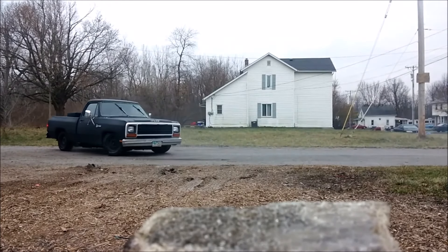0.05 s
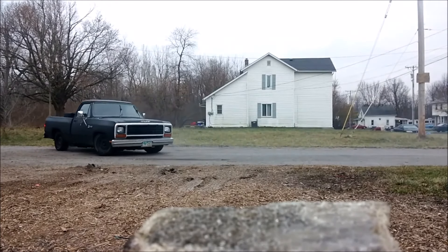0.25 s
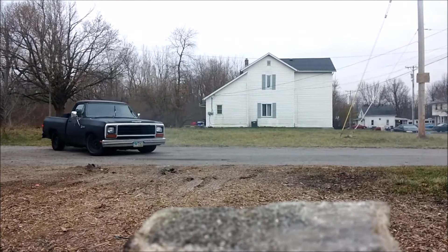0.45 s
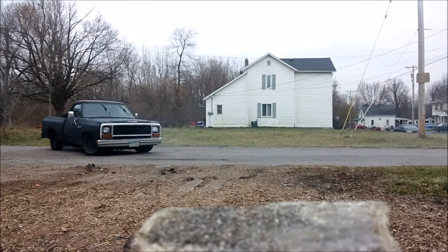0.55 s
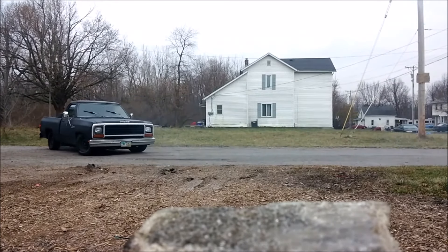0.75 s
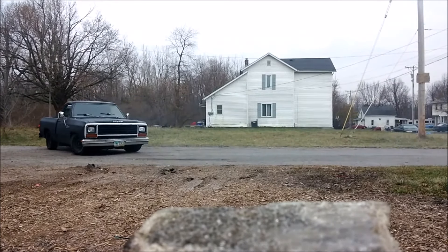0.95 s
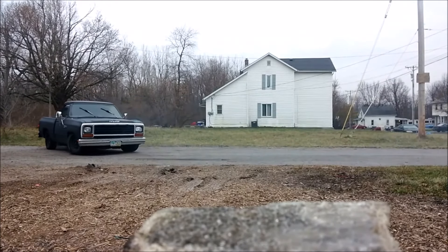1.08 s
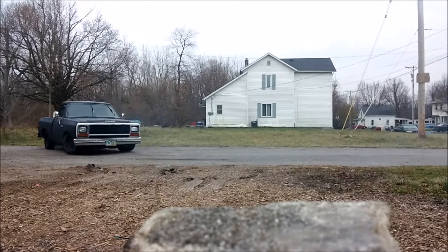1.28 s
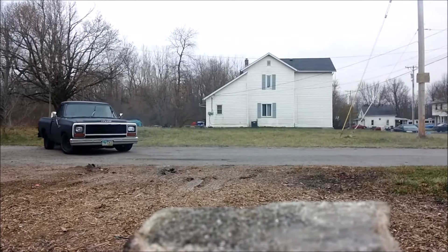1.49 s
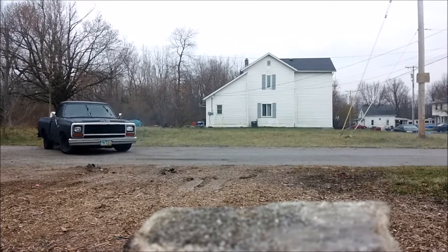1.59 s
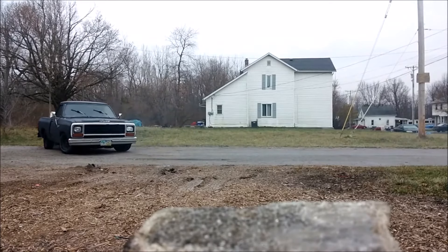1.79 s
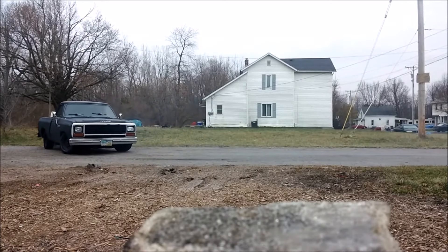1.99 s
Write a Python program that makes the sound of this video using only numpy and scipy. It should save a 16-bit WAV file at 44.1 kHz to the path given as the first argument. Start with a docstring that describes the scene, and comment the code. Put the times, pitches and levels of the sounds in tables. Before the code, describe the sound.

Outdoors, a rough V8 truck creeps along a road: uneven booming, burbling exhaust, metallic engine clatter and high squeaks throughout, a sharp stone snap, later a loose part's knock, then a short wind thump on the left.

```python
"""On a road in the open air, an old V8 pickup creeps along to the left of the microphone.
Uneven firing pulses ring its open pipes, which boom, bark and burble. Shaped noise makes the engine
clatter, the tyres' gritty hiss and snapping stones, the rattles and the faint background air.
Narrow bands of noise make a ringing part and belt-like squeals; a loose part clunks as dying tones
and noise. A puff of wind hits only the left microphone port."""
import sys
import numpy as np
from scipy import signal
from scipy.fft import rfft, irfft, next_fast_len
from scipy.io import wavfile
from scipy.ndimage import uniform_filter1d

SR = 44100
rng = np.random.default_rng(int(sys.argv[2]) if len(sys.argv) > 2 else 0)


def bounce(signal):
    """Save signal as a 16-bit WAV file at the path given by the first command-line argument."""
    frames = np.transpose(np.atleast_2d(signal))
    limited = np.clip(frames, -1, 1)
    pcm = np.round(limited * 32767).astype(np.int16)
    wavfile.write(sys.argv[1], SR, pcm)


N = 89875
T = np.arange(N) / SR  # time of each sample, s

# Levels of the truck's sounds are those before the path to the two ports.
# Engine speed: t/s, speed/(four-stroke cycles per second)
ENGINE_SPEED = [(0, 5.157), (.3, 5.058), (.6, 5.12), (.85, 5.317), (1.0, 5.335), (1.15, 4.944),
                (1.35, 4.742), (1.55, 5.012), (1.75, 5.21), (2.04, 4.898)]
START_TURN = .0145  # engine position at the start, cycles
# Cylinders in firing order: lateness/s (below zero is early), strength/dB
CYLINDERS = [(.0029, -3.9), (-.0033, 4), (-.0009, 2.4), (-.0011, .5), (.0016, -1), (.0023, 4.8),
             (-.0016, -8.7), (.0002, 3.2)]
SCATTER_DB, JITTER_S = 4.1, 0.00029  # random spread from firing to firing

# Exhaust boom: t/s, level/dB
BOOM_LEVEL = [(0.0, -21.5), (0.055, -24.5), (0.1, -32.5), (0.21, -23), (0.29, -28.5), (0.41, -22.5),
              (0.49, -29.5), (0.61, -24), (0.69, -31), (0.83, -21), (0.89, -32.5), (1.02, -26),
              (1.08, -37.5), (1.14, -22.5), (1.235, -37), (1.28, -21.2), (1.38, -32), (1.45, -28),
              (1.51, -38.2), (1.59, -35), (1.66, -28.5), (1.82, -28), (1.9, -31.5), (1.945, -28),
              (2.04, -28)]
# Colour of the two booming pipe resonances: f/Hz, level/dB
BOOM_COLOUR = [(25, -43.5), (45, -18.5), (62, -9), (73, -3), (81, 4.5), (89, -2), (97, -11.5), (105, 4),
               (113, 1.5), (122, 0.5), (137, -1.5), (165, -31.5), (240, -25), (400, -48.5), (2000, -83)]
# Shift of the upper boom against the lower: t/s, level/dB
BOOM_TILT = [(0, -2), (.22, -1.5), (.3, -2.5), (.6, -0.5), (.7, 2), (.8, 1), (1.02, 6.5), (1.1, 1.5),
             (1.25, -1), (1.45, -3.5), (1.56, 9.5), (1.66, 4), (1.78, -11.5), (1.85, 5.5), (1.95, -8.5),
             (2.04, 5)]
BOOM_SPLIT_HZ = 96  # the valley between the two booms
# Colour of the higher pipe resonances: f/Hz, level/dB
BARK_COLOUR = [(60, -52), (160, -5), (188, 4.5), (215, -0.5), (255, 2), (280, 1.5), (306, 1), (345, -7.5),
               (420, -11), (700, -30), (2000, -46.5)]
BARK_DB, BARK_FOLLOWS = -48.5, 0.18  # mean level; share of the boom's swings in dB that it follows
# Moments when the pipes bark up: t/s, f/Hz, level/dB
BURBLES = [(.2, 268, -40.5), (.21, 302, -39.5), (.335, 245, -41), (.405, 256, -43.5), (.54, 396, -42.5),
           (.61, 252, -45.5), (.68, 260, -49), (.82, 387, -44.5), (1.025, 190, -39.5), (1.118, 331, -41.5),
           (1.28, 242, -44.5), (1.6, 220, -41.5), (1.82, 190, -41), (1.99, 195, -44)]
BURBLE_S, BURBLE_WIDTH_HZ = 0.044, 48

# Engine clatter, before the lift in engine_bay: t/s, level/dB
CLATTER_LEVEL = [(0.0, -38.5), (0.08, -43.5), (0.31, -39), (0.34, -46.5), (0.39, -38.5), (0.43, -48),
                 (0.49, -40), (0.53, -43.5), (0.66, -39), (0.72, -42.5), (0.75, -39.5), (0.89, -43.5),
                 (1.28, -42), (1.68, -45.5), (1.89, -45), (2.04, -48)]
# Colour of the clatter: f/Hz, level/dB
CLATTER_COLOUR = [(100, 15.5), (250, 9.5), (450, -2), (800, 2.5), (1400, 4.5), (2200, 3), (3000, 1),
                  (3800, 3), (4600, -11.5), (6000, -14), (12000, -32.5)]
# Moments when one part sings: t/s, level/dB
RINGS = [(.02, -45), (0.177, -41.5), (0.379, -37.5), (0.484, -39), (0.638, -41), (0.761, -38),
         (0.951, -44.5), (1.04, -46.5), (1.271, -41.5), (1.598, -49), (1.69, -54), (1.881, -41.5)]
RING_HZ, RING_WIDTH_HZ, RING_S = 1208.5, 39, 0.059

# One long squeal, mostly falling: t/s, f/Hz, level/dB
SQUEAL = [(.16, 3540, -75), (.185, 3513, -39.5), (.25, 3500, -50), (.3, 3370, -46), (.33, 3320, -53),
          (0.371, 3380, -35), (.385, 3220, -38.5), (.405, 3230, -75)]
# Chirps: t/s (middle), length/s, f/Hz (at the middle), level/dB
CHIRPS = [(0.174, 0.016, 3750, -36.5), (0.278, 0.019, 2740, -43), (0.297, 0.031, 3630, -40),
          (0.473, 0.039, 2770, -40), (0.481, 0.046, 3630, -39.5), (0.565, 0.09, 3758, -41.5),
          (0.742, 0.054, 3540, -42), (0.795, 0.043, 2700, -43), (0.886, 0.038, 2740, -40),
          (0.99, 0.035, 3710, -56), (1.049, 0.026, 2332, -42), (1.132, 0.031, 2300, -35),
          (1.192, 0.039, 2370, -38.5), (1.333, 0.016, 2860, -39), (1.36, .025, 2350, -39),
          (1.417, 0.04, 3680, -37), (1.499, 0.022, 3483, -39), (1.499, 0.019, 2880, -37.5),
          (1.582, 0.051, 2810, -40.5), (1.606, 0.048, 2317, -43), (1.693, 0.038, 3710, -43.5),
          (1.762, 0.023, 3565, -39.5), (1.809, 0.047, 2310, -41.5), (1.832, 0.021, 2900, -43.5),
          (1.826, 0.053, 3810, -53), (1.933, 0.02, 2890, -38.5), (2.027, 0.024, 2955, -38.5)]
CHIRP_RISE_HZ, CHIRP_SPREAD = 114, 8  # rise over one length; bandwidth times length

# Knocks of the loose part: t/s, level/dB
CLUNKS = [(0.414, -42.5), (0.468, -42.5), (1.4196, -30.5), (1.428, -46), (1.44, -38.5)]
# Tones of the struck chassis: f/Hz, level/dB, time to fall 60 dB/s
CHASSIS = [(314, -3.5, 0.14), (487, -6, 0.084), (579, -6, .1), (688, 1.5, .09), (840, -0.5, 0.054),
           (970, -3, 0.055)]

# Stones that snap under a tyre: t/s, f/Hz, level/dB
STONES = [(0.6193, 3770, -20.5), (.641, 3930, -28), (.654, 3700, -31), (0.682, 4570, -31),
          (1.099, 5000, -36)]
# Colour of a snap: f/(pitch of the snap), level/dB
SNAP_COLOUR = [(.4, -29), (.62, -25), (.75, -2.5), (1, 3.5), (1.2, -2.5), (1.35, -10), (1.6, -35), (3, -65)]

# Bodywork rattles: t/s (middle), length/s, level/dB
RATTLES = [(0.466, 0.034, -40), (0.784, 0.16, -43), (1.26, 0.024, -44), (1.897, 0.077, -42.5)]
# Colour of a rattle: f/Hz, level/dB
RATTLE_COLOUR = [(500, -36), (1000, -19), (1350, -2.5), (1750, -8.5), (2300, -8), (4000, -35)]

# Tyres on grit, before each port's own lift: t/s, level/dB
GRIT_LEVEL = [(0.0, -52.5), (0.06, -54), (0.14, -54), (0.45, -61), (0.47, -55), (0.52, -61.5),
              (0.63, -51.5), (0.68, -55), (1.05, -62), (1.14, -49), (1.24, -59), (1.26, -54), (1.68, -65.5),
              (1.72, -54), (2.01, -63), (2.04, -51.5)]
# Colour of the grit: f/Hz, level/dB
GRIT_COLOUR = [(500, 22), (2000, 4), (4500, 12.5), (6200, 4), (7500, 6), (9500, 1.5), (11500, -8.5),
               (14000, -16), (16000, -36)]

# Pushes of the wind, before the low cut: t/s (middle), length/s, f/Hz, level/dB
BUFFETS = [(1.7, 0.018, 100, -8), (1.719, .016, 180, -12.5), (1.739, 0.017, 88.3, -10.5)]
PUFF_S, PUFF_HOLD_S = 1.690, 0.1  # start of the slap; how long it lasts

# How much louder the left port is than the right: f/Hz, level/dB
LEFT_OVER_RIGHT = [(60, 8), (160, 4.5), (300, 2), (1100, 7), (1800, 3.5), (3000, 11), (4700, 11),
                   (7000, 3.5), (14000, -3)]
# Scattered sound against direct sound: f/Hz, level/dB
SCATTERED_COLOUR = [(60, -9), (120, -30), (300, -4), (800, -2), (2500, -10.5), (6000, -10)]
PORT_LAG_S = .0001  # the right port hears the truck this much later
TOP_HZ = 15700  # upper limit of all the sound


def amp(db):
    """Turn decibels into a plain gain."""
    return 10 ** (np.asarray(db) / 20)


def unit(x):
    """Scale x to an rms of 1."""
    return x / np.sqrt(np.mean(x ** 2) + 1e-20)


def along(points, hz):
    """Read a value between (f/Hz, value) points on a log axis."""
    f, v = np.transpose(points)
    return np.interp(np.log(hz + 1), np.log(f + 1), v)


def curve(rows):
    """Join (t/s, value) points with lines, one value per sample."""
    return np.interp(T, *np.transpose(rows))


def filtered(x, response):
    """Multiply the spectrum of x by a response that depends on frequency."""
    m = next_fast_len(N + SR // 2)
    return irfft(rfft(x, m) * response(np.fft.rfftfreq(m, 1 / SR)), m)[..., :N]


def noise(colour):
    """Coloured noise of rms 1."""
    return unit(filtered(rng.standard_normal(N), lambda hz: amp(along(colour, hz))))


def causal(x, colour):
    """Pass x through a body that rings only after it is struck."""
    size = 16384
    # Folding the cepstrum forward in time gives the filter its minimum phase.
    cepstrum = irfft(np.log(amp(along(colour, np.fft.rfftfreq(size, 1 / SR)))))
    cepstrum[1:size // 2] *= 2
    cepstrum[size // 2:] = 0
    return signal.fftconvolve(x, irfft(np.exp(rfft(cepstrum))))[:N]


def resonance(x, centre_hz, width_hz):
    """Pass x through one resonance."""
    return filtered(x, lambda f: 1j * f * width_hz / (centre_hz ** 2 - f ** 2 + 1j * f * width_hz))


def fuzzy(phase, width_hz):
    """A narrow band of noise around a running phase in turns, rms 1."""
    i, q = filtered(rng.standard_normal((2, N)), lambda hz: 1 / (1 + (2 * hz / width_hz) ** 2))
    return unit(i * np.cos(2 * np.pi * phase) + q * np.sin(2 * np.pi * phase))


def patchy(x, depth_db):
    """Give x random patches of gain in time and frequency."""
    z = signal.stft(x, nperseg=512)[2]
    field = uniform_filter1d(rng.standard_normal(z.shape), size=4, axis=0)
    field = uniform_filter1d(field, size=7, axis=1)
    return unit(signal.istft(z * amp(depth_db * unit(field)), nperseg=512)[1][:N])


def decay(start, t60):
    """A sudden start that falls 60 dB in t60 seconds."""
    return (T >= start) * amp(-60 * np.maximum(T - start, 0) / t60)


def swell(s, length, sound):
    """A sound that swells and fades around time s, rms 1 at its top."""
    shape = np.exp(-(2 * (T - s) / length) ** 2)
    return shape * sound * np.linalg.norm(shape) / np.linalg.norm(shape * sound)


def exhaust(turn):
    """One pulse per firing rings the pipes; unequal cylinders make the V8 lope."""
    firing = np.arange(int(len(CYLINDERS) * turn[-1]) + 1)
    late, strength_db = np.array(CYLINDERS)[firing % len(CYLINDERS)].T
    chance = rng.standard_normal((len(firing), 2))
    when = np.interp(firing / len(CYLINDERS), turn, T) + late + JITTER_S * chance[:, 0]
    strength = amp(strength_db + SCATTER_DB * chance[:, 1])
    pulses = np.bincount(np.clip(when * SR, 0, N - 1).astype(int), strength, N)
    pulses = pulses - pulses.mean()

    boom = unit(causal(pulses, BOOM_COLOUR))
    bark = unit(causal(pulses, BARK_COLOUR))
    lower = filtered(boom, lambda hz: 1 / (1 + (hz / BOOM_SPLIT_HZ) ** 12))
    upper = boom - lower
    tilt = amp(curve(BOOM_TILT) / 2)  # half is added above, half taken off below

    level_db = curve(BOOM_LEVEL)
    bark_db = BARK_DB + BARK_FOLLOWS * (level_db - level_db.mean())
    burbles = sum(amp(db) * swell(s, BURBLE_S, resonance(bark, hz, BURBLE_WIDTH_HZ))
                  for s, hz, db in BURBLES)
    return amp(level_db) * (lower / tilt + upper * tilt) + amp(bark_db) * bark + burbles


def engine_bay(turn, beat_db=1.1, rough_db=1.48, patchy_db=3, lift_db=4.0):
    """Shifting noise clatters in beat with the firings, and one part rings."""
    flutter = noise([(5, -6.0), (60, 25), (250, -10), (600, -86)])
    beat = amp(beat_db * np.cos(2 * np.pi * len(CYLINDERS) * turn) + rough_db * flutter)
    clatter = unit(beat * patchy(noise(CLATTER_COLOUR), patchy_db))
    ring = sum(amp(db) * swell(s, RING_S, fuzzy(RING_HZ * T, RING_WIDTH_HZ)) for s, db in RINGS)
    return amp(curve(CLATTER_LEVEL) + lift_db) * clatter + ring


def belt(squeal_width_hz=26):
    """Probably a belt: one long squeal, and rising chirps that scrape more the shorter they are."""
    s, hz, db = np.transpose(SQUEAL)
    phase = np.cumsum(np.interp(T, s, hz)) / SR
    squeal_level = amp(np.interp(T, s, db)) * (T > s[0]) * (T < s[-1])
    squeal = squeal_level * np.tanh(2 * fuzzy(phase, squeal_width_hz))  # tanh evens out the strength
    squeal = filtered(squeal, lambda f: 1 / (1 + (f / (1.5 * hz[0])) ** 16))  # drop the overtones

    chirps = 0
    for s, length, hz, db in CHIRPS:
        phase = hz * T + CHIRP_RISE_HZ / length * (T - s) ** 2 / 2
        chirps = chirps + amp(db) * swell(s, length, fuzzy(phase, CHIRP_SPREAD / length))
    return squeal + chirps


def clunk(thud_db=1, thud_t60=0.046, dull_hz=1150):
    """A loose part knocks on the chassis: dying tones plus a burst of noise, dulled at the top."""
    # Each tone of each knock differs in strength by chance (2.3 dB spread).
    ring = sum(amp(db + level + rng.normal(0, 2.3)) * decay(s, t60) * np.sin(2 * np.pi * hz * (T - s))
               for s, db in CLUNKS for hz, level, t60 in CHASSIS)
    thud = sum(amp(db + thud_db) * decay(s, thud_t60) for s, db in CLUNKS)
    thud_colour = [(200, -11), (300, 2), (450, -5), (700, 22), (900, 13.5), (1200, 5), (3000, -40)]
    knocks = ring + thud * noise(thud_colour)
    return filtered(knocks, lambda hz: 1 / (1 + (hz / dull_hz) ** 8))


def stones(crumble_db=2, snap_t60=.032):
    """Stones snap and crumble under a tyre: grainy, pitched noise that dies away fast."""
    grains = amp(crumble_db * noise([(50, 6), (500, -7), (1200, -50)]))
    snaps = 0
    for s, hz, db in STONES:
        colour = [(hz * multiple, level) for multiple, level in SNAP_COLOUR]
        snaps = snaps + amp(db) * decay(s, snap_t60) * unit(grains * noise(colour))
    return snaps


def rattles():
    """Brief swells of rough noise are the bodywork rattling."""
    return sum(amp(db) * swell(s, length, noise(RATTLE_COLOUR)) for s, length, db in RATTLES)


def grit(grain_db=1.5, patchy_db=3.0, left_db=13.5, right_db=5):
    """Tyres on grit: a grainy, patchy hiss, unrelated at the two ports."""
    grains = amp(grain_db * noise([(20, 1), (700, -8), (2000, -62)]))
    ports = []
    for lift_db in (left_db, right_db):
        hiss = unit(grains * patchy(noise(GRIT_COLOUR), patchy_db))
        ports.append(amp(curve(GRIT_LEVEL) + lift_db) * hiss)
    return np.array(ports)


def puff(width_hz=40, slap_db=-20, slap_t60=0.15, low_hz=45):
    """A short puff of wind: a slap of noise, then a few dull pushes."""
    gate = np.interp(T - PUFF_S, [0, .003, PUFF_HOLD_S / 2, PUFF_HOLD_S], [0, 1, 1, 0])
    gust = sum(amp(db) * swell(s, length, fuzzy(hz * T, width_hz)) for s, length, hz, db in BUFFETS)
    gust = filtered(gust, lambda hz: hz ** 4 / (hz ** 4 + low_hz ** 4))  # cut the deepest part
    slap_colour = [(80, -7), (200, 5), (320, 2), (500, -13), (900, -43), (3000, -80)]
    slap = gate * decay(PUFF_S, slap_t60) * noise(slap_colour)
    return gust + amp(slap_db) * slap


def air(level_db=-53):
    """The faint open-air background: steady noise, unrelated at the two ports."""
    colour = [(20, 7), (60, -12), (300, 9), (800, -1), (2500, 20), (6000, -29), (15000, -43)]
    return amp(level_db) * np.array([noise(colour), noise(colour)])


def outdoors(x, t60=0.088):
    """Sound reaches the left port first and mostly louder; ground and trees scatter some of it."""
    t = T[:SR // 2]
    tail = rng.standard_normal((2, len(t))) * amp(-60 * t / t60)
    scattered = signal.fftconvolve(x[None], tail / np.linalg.norm(tail[0]), axes=1)[:, :N]
    sides = np.array([[.5], [-.5]])  # half of each difference goes to each port
    direct = filtered(x, lambda hz: np.exp(2j * np.pi * hz * PORT_LAG_S * sides))
    pair = direct + filtered(scattered, lambda hz: amp(along(SCATTERED_COLOUR, hz)))
    return filtered(pair, lambda hz: amp(sides * along(LEFT_OVER_RIGHT, hz)))


def scene():
    """The truck to the left, grit and air at both ports, wind on the left one."""
    turn = START_TURN + np.cumsum(curve(ENGINE_SPEED)) / SR  # engine cycles so far
    truck = exhaust(turn) + engine_bay(turn) + belt() + clunk() + stones() + rattles()
    left, right = outdoors(truck)
    return np.array([left + puff(), right]) + grit() + air()


def record(dry):
    """Cut off everything from the upper limit upwards."""
    return filtered(dry, lambda hz: hz < TOP_HZ)


dry = scene()
out = record(dry)
bounce(out)
```